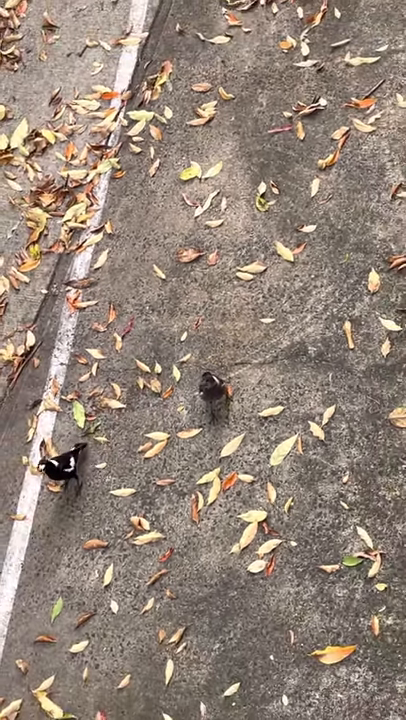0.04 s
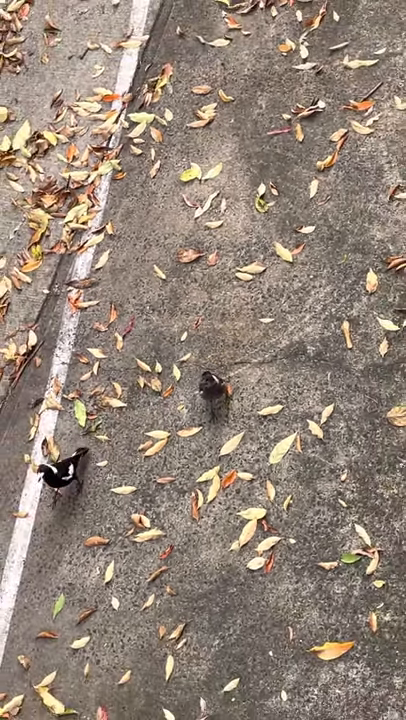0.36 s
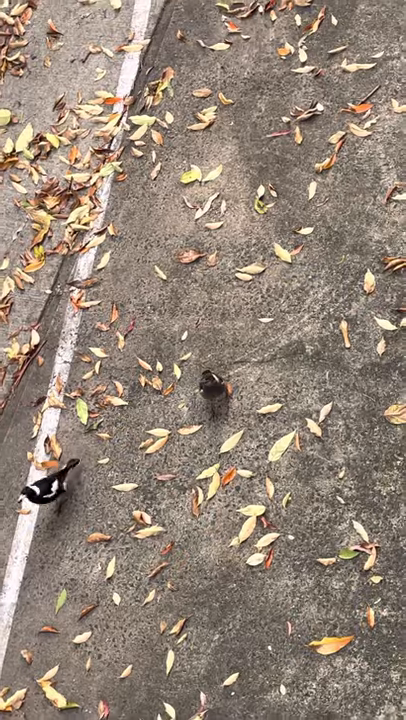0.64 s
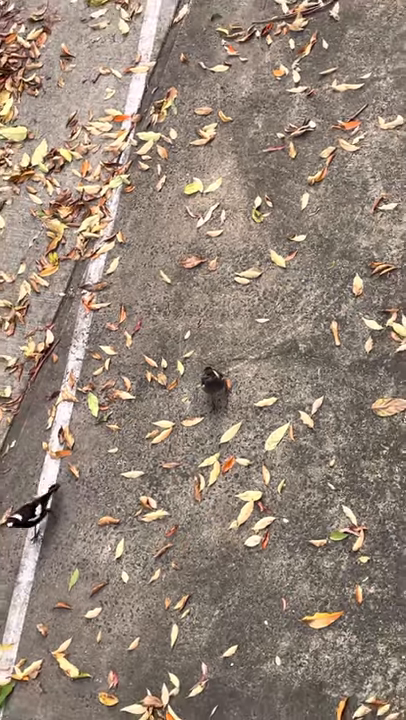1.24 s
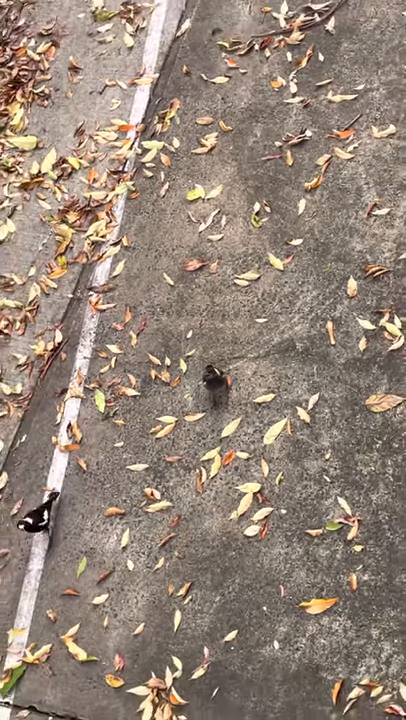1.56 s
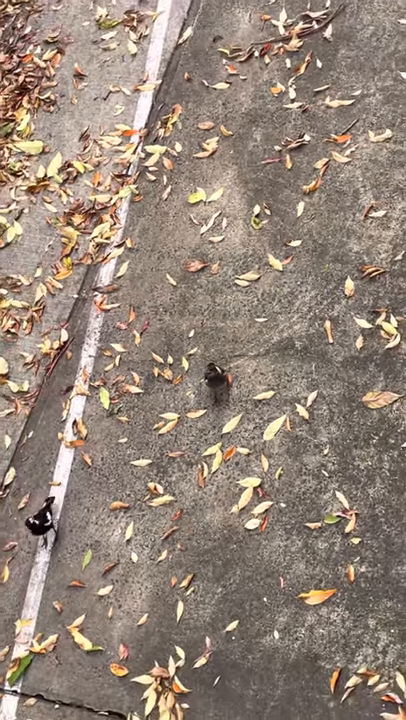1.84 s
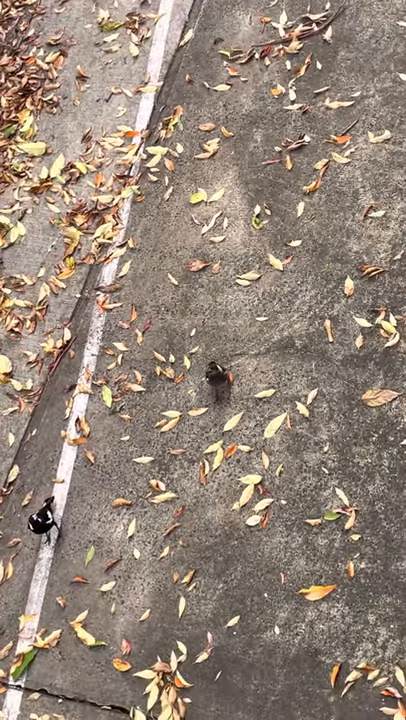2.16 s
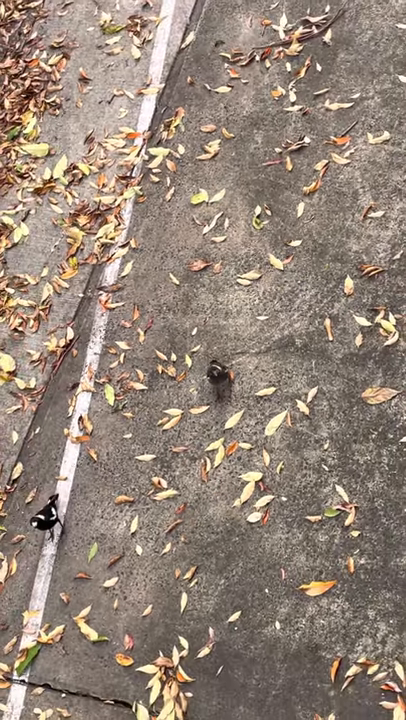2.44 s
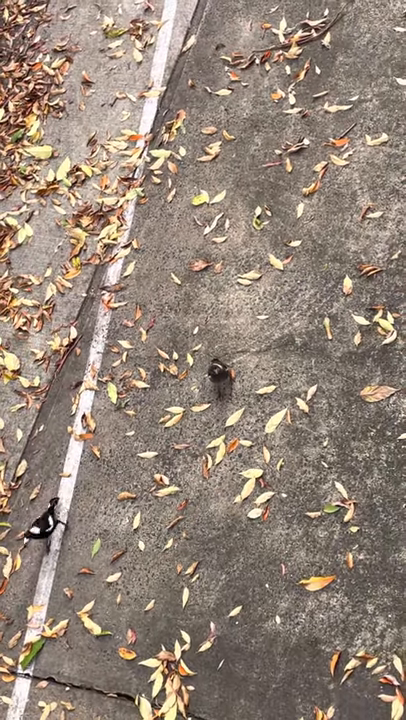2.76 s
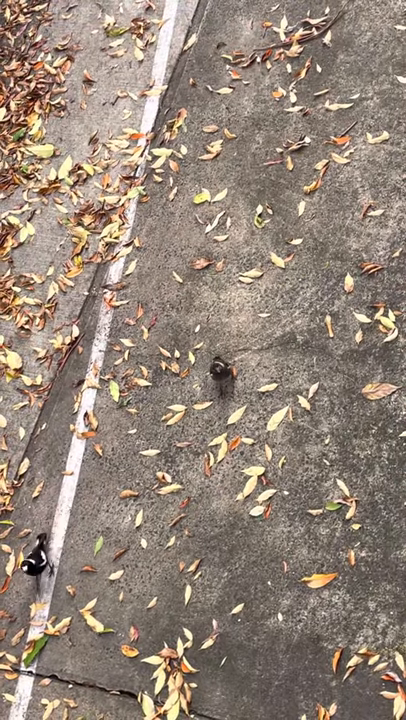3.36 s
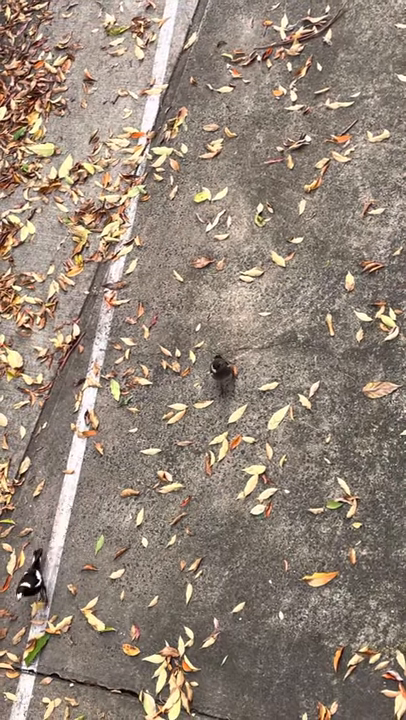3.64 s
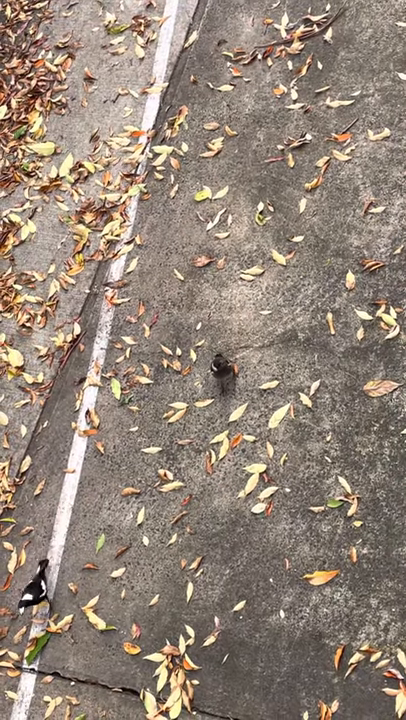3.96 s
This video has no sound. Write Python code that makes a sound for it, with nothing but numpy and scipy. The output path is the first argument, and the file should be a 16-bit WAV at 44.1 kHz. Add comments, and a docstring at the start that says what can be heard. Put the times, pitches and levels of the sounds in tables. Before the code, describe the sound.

Short, rising squawks from a begging young bird repeat seven times in a paved yard, with a shrill edge and a slight echo. Behind them runs a low rumble of far traffic and a faint wavering hum.

```python
"""A young bird begs seven times on a paved yard: nasal squawks that slide upward, turn harsh and drop off.
Its syrinx is a harmonic source that irregular modulation frays into rasp; a sharp whistling peak near
5.3 kHz varies in strength from call to call. Pavement and nearby walls return short echoes and a tail.
Distant traffic rumbles underneath as shaped noise, with the faint wavering hum of a motor."""
import sys
import numpy as np
from scipy import signal
from scipy.fft import rfft, irfft
from scipy.io import wavfile

SR = 44100
rng = np.random.default_rng(int(sys.argv[2]) if len(sys.argv) > 2 else 0)


def store_pcm(level_fs):
    """Save levels as 16-bit WAV."""
    pcm = np.round(np.clip(level_fs, -1, 1) * 32767).astype(np.int16)
    wavfile.write(sys.argv[1], SR, np.atleast_2d(pcm).T)


N = 176400

ATTACK_S, RELEASE_S, VOICING_S = 0.0062, 0.032, 0.03
DROP_HZ, FALL_FADE_DB = 110.3, 2.5   # pitch and level lost over a call's fall time
JITTER, HARSH_JITTER, JITTER_RATE_HZ = 0.0049, 0.016, 93   # depths are shares of the pitch
HARSH_FROM, RATTLE_DEPTH, RASP_HZ = 0.42, 0.3, 170   # harshness sets in at this share of the rise
RASP_CALM, RASP_HARSH = 0.1, 0.6   # rasp's share of a harmonic's power: base, added at full strain
SHIMMER_DB, BREATH_DB, RASP_HISS_DB = 1.5, -57.5, -55
NASAL_HZ, WHISTLE_HZ, EDGE_HZ, PEAK_OCTAVES = 3100, 5250, 9000, 0.065
EARLY_PITCH_HZ, LATE_PITCH_HZ = 920, 1030   # between these the whistle's gain goes from early to late


def bird():
    """Superposition: seven begging calls add up, each with its own glide and timbre."""
    # calls: (start [s], rise [s], fall [s], pitch at five even steps of the rise [Hz], gain [dB],
    # nasal peak [dB], early whistle [dB], late whistle [dB], edge [dB], harshness [0-1])
    calls = [(.010, 0.17, 0.014, (687, 790, 916, 1013, 1089), -1, 3, 1, 2.5, 2.5, 0.1),
             (.565, 0.19, 0.029, (675, 850, 987, 1068, 1104), -1, 2.5, -5, 0, 1.5, 0.71),
             (1.000, 0.16, 0.023, (682.6, 790, 924, 1033, 1088), -2, -4.5, -6, -2.5, 1, 0.37),
             (1.570, 0.21, .022, (663, 765, 893, 1009, 1101), -0.5, 3, 1, 3, 2.2, 0.2),
             (2.310, .218, .024, (650, 730, 838, 982, 1047), 0, 1, 5.5, -1.5, -0.5, 0.13),
             (3.150, 0.24, .030, (647.6, 800, 996, 1128, 1188), 0, -0.5, 3, 2.5, 1, 0.46),
             (3.730, 0.18, 0.024, (659, 745, 872.5, 1009, 1061), 0.6, -5.5, 2, 2, 1, 0.01)]
    out = np.zeros(N + SR)
    for start_s, rise_s, fall_s, climb_hz, gain_db, *timbre in calls:
        call = squawk(rise_s, fall_s, climb_hz, *timbre)
        onset = int(start_s * SR)
        out[onset:onset + len(call)] += from_db(gain_db) * call
    return out[:N]


def squawk(rise_s, fall_s, climb_hz, nasal_db, early_db, late_db, edge_db, harshness, harmonics=18):
    """Source and filter: syrinx harmonics sweep through fixed spectral peaks and fray under strain."""
    # spectrum of the call as heard, with a sharp whistling peak near 5.3 kHz:
    # (frequency [Hz], base level of a harmonic [dB])
    spectrum = [(600, -42.5), (780, -44.5), (940, -42), (1060, -49), (1170, -48), (1400, -46.5),
                (1700, -42.5), (1830, -51), (2200, -52), (2380, -49), (2520, -49), (2800, -52.5),
                (3150, -50), (3600, -55), (4200, -57.5), (4800, -55), (5050, -50.5), (5300, -43.5),
                (5600, -54), (5900, -51.5), (6200, -63), (6600, -59.5), (7500, -91), (8600, -56),
                (9500, -58.5), (10000, -63), (10500, -61), (12200, -69.5), (14500, -94)]
    # effort grows with pitch: (pitch [Hz], gain of the fundamental [dB], gain of the overtones [dB])
    effort = [(684, -7.5, -7.5), (772, -1, -6), (820, -1, -3.5), (938, 0.5, 2), (1080, 1, 2),
              (1185, 1.5, 6.5)]
    t = np.arange(int((rise_s + fall_s + RELEASE_S / 2) * SR)) / SR
    size = len(t)
    risen = np.clip(t / rise_s, 0, 1)
    fallen = np.maximum(t - rise_s, 0) / fall_s
    strain = harshness * np.clip((risen - HARSH_FROM) * 6, 0, 1)
    climb = np.polyfit(np.linspace(0, 1, len(climb_hz)), climb_hz, len(climb_hz) - 1)
    hz = np.polyval(climb, risen) - DROP_HZ * fallen ** 1.61
    jitter = JITTER * drift(JITTER_RATE_HZ, size) + HARSH_JITTER * strain * drift(2 * RASP_HZ, size)
    phase = 2 * np.pi * np.cumsum(hz * (1 + jitter)) / SR
    pitches, *gains = np.transpose(effort)
    fundamental_db, overtones_db = [np.interp(hz, pitches, gain) for gain in gains]
    whistle_db = np.interp(hz, (EARLY_PITCH_HZ, LATE_PITCH_HZ), [early_db, late_db])
    rasp = RASP_CALM + RASP_HARSH * strain
    voice = 0
    for k in range(1, harmonics + 1):
        db = at_hz(spectrum, k * hz) + (overtones_db if k > 1 else fundamental_db)
        db += timbre_db(k * hz, nasal_db, whistle_db, edge_db) + SHIMMER_DB * drift(48, size)
        tone = np.sin(k * phase)
        noise_band = drift(RASP_HZ, size) * tone + drift(RASP_HZ, size) * np.cos(k * phase)
        voice += from_db(db) * (np.sqrt(2 * (1 - rasp)) * tone + np.sqrt(rasp) * noise_band)
    puffs = rng.standard_normal(size) * (1 + np.cos(phase))   # breath pulses once a cycle
    hiss = irfft(rfft(puffs) * from_db(at_hz(spectrum, bins(size))) * np.sqrt(bins(size)), size)
    hiss *= (from_db(BREATH_DB) + strain * from_db(RASP_HISS_DB)) / hiss.std()
    # the tone grows out of the hiss and softens as it drops
    voicing = np.clip(t / VOICING_S, 0, 1) * from_db(-FALL_FADE_DB * np.minimum(fallen, 1))
    envelope = np.clip(t / ATTACK_S, 0, 1) * np.clip((t[-1] - t) / RELEASE_S, 0, 1)
    rattle = 1 + RATTLE_DEPTH * strain * drift(RASP_HZ, size)
    return envelope * (voicing * voice + hiss) * rattle


def timbre_db(hz, nasal_db, whistle_db, edge_db):
    """Spectral shaping: a nasal peak, a whistling peak and the top vary in strength from call to call."""
    nasal = np.exp(-0.5 * (np.log2(hz / NASAL_HZ) / PEAK_OCTAVES) ** 2)
    whistle = np.exp(-0.5 * (np.log2(hz / WHISTLE_HZ) / PEAK_OCTAVES) ** 2)
    edge = np.clip((hz / EDGE_HZ) ** 10, 0, 1)
    return nasal_db * nasal + whistle_db * whistle + edge_db * edge


def yard(direct, t60_s=0.5, tail_db=-11.5):
    """Reflection and reverberation: hard surfaces add echoes and an exponentially decaying tail."""
    # reflections from pavement and walls: (delay [s], gain [dB])
    reflections = [(.0075, -16.5), (.017, -14), (.036, -19.5)]
    # spectrum of the tail: (frequency [Hz], relative level [dB])
    colour = [(900, -5), (3200, 6.5), (5300, -3.5), (6500, 10), (10000, -5)]
    t = np.arange(N) / SR
    echoes = sum(from_db(db) * np.interp(t - delay, t, direct, left=0) for delay, db in reflections)
    build_up = np.clip(t[:SR] / 0.022, 0, 1)
    tail = diffuse_noise(colour, SR) * from_db(-60 * t[:SR] / t60_s) * build_up
    tail /= np.sqrt(np.sum(tail ** 2) / 2)   # unit mean energy per channel
    reverberation = signal.fftconvolve(direct[None], tail, axes=1)[:, :N]
    return direct + echoes + from_db(tail_db) * reverberation


def traffic():
    """Incoherent sources add in power: far engines rumble and swell under a wash of road noise."""
    # spectra of engine rumble, low roar and even wash: (frequency [Hz], base density [dB per Hz])
    rumble = [(20, -90), (32, -70), (46, -71.5), (64, -54.5), (82, -56), (100, -59), (120, -53.5),
              (155, -64.5), (230, -76), (400, -117), (1000, -130)]
    roar = [(150, -93), (230, -68.5), (310, -72), (450, -82), (800, -100), (2000, -130)]
    wash = [(25, -99), (100, -75.5), (200, -64), (280, -69.5), (400, -75), (600, -76.5), (950, -75.5),
            (1400, -82), (2000, -84.5), (3000, -90.5), (5200, -92), (7000, -104), (10000, -100),
            (12500, -105), (14000, -125)]
    # how each swells and ebbs: (time [s], gain [dB])
    rumble_gain = [(0, 0), (.7, -3), (1, -4), (1.35, -2.5), (1.7, -1), (1.92, 4), (2.1, 1.5), (2.25, -3.5),
                   (2.46, 2), (2.7, 0), (2.95, -2.5), (3.5, -0.5), (4, -2)]
    roar_gain = [(0, -4), (1.2, -9), (1.75, 1), (2.1, -4), (2.4, -1), (3, -2), (3.5, 2.5), (4, 2.5)]
    wash_gain = [(0, 1), (.9, 0.5), (1.7, .5), (2.2, 1), (2.8, 0.5), (3.4, 0.5), (4, 1)]
    layers = [(rumble, rumble_gain), (roar, roar_gain), (wash, wash_gain)]
    return sum(diffuse_noise(spectrum, N) * from_db(in_time(gain)) for spectrum, gain in layers)


def motor_hum(pitch_hz=187, waver_hz=1.8, flicker_db=2):
    """Frequency and amplitude modulation: a distant motor tone wavers and fades in and out."""
    # slow course of the hum, before its flicker: (time [s], level [dB])
    level = [(0, -44), (.4, -46), (1.4, -44.5), (1.7, -48.5), (2.3, -52.5), (2.9, -50.5), (3.4, -40),
             (4, -46.5)]
    phase = 2 * np.pi * np.cumsum(pitch_hz + waver_hz * drift(4.55, N)) / SR
    return np.sqrt(2) * from_db(in_time(level) + flicker_db * drift(5.5, N)) * np.sin(phase)


def diffuse_noise(spectrum, size):
    """Diffuse field: noise from all around is coherent between the channels mainly in the bass."""
    # likeness of left and right: (frequency [Hz], coherence [0-1])
    likeness = [(60, .9999), (170, .9995), (270, .985), (420, .84), (700, .56), (1200, .62), (2100, .83),
                (4000, .86), (7000, .75), (12000, .7)]
    hz = bins(size)
    coherence = at_hz(likeness, hz)
    mid, side = rfft(rng.standard_normal((2, size)))
    stereo = np.sqrt((1 + coherence) / 2) * mid + np.sqrt((1 - coherence) / 2) * side * [[1], [-1]]
    return irfft(stereo * from_db(at_hz(spectrum, hz)), size) * np.sqrt(SR / 2)


def drift(rate_hz, size):
    """Random fluctuation: low-passed noise with unit standard deviation."""
    pole = np.exp(-2 * np.pi * rate_hz / SR)
    slow = signal.lfilter([1], [1, -2 * pole, pole * pole], rng.standard_normal(size + SR))[SR:]
    return slow / slow.std()


def from_db(db):
    """Decibel law: 20 dB is a tenfold amplitude."""
    return 10 ** (np.asarray(db) / 20)


def in_time(rows):
    """Linear interpolation of a time curve at every sample."""
    return np.interp(np.arange(N) / SR, *np.transpose(rows))


def at_hz(points, hz):
    """Interpolation of a spectrum on a log-frequency axis."""
    knots_hz, values = np.transpose(points)
    return np.interp(np.log(np.maximum(hz, 1)), np.log(knots_hz), values)


def bins(size):
    """Fourier frequencies [Hz] of this many samples."""
    return np.arange(size // 2 + 1) * SR / size


def scene():
    """Superposition: the bird in its yard adds to the traffic and the hum."""
    return yard(bird()) + traffic() + motor_hum()


def record(dry, cutoff_hz=15700):
    """Phase shift: two microphone ports offset the treble against each other; a low-pass cuts the top."""
    # lead of the left port over the right: (frequency [Hz], phase [rad])
    port_phase = [(100, 0), (1600, 0), (2800, .7), (4400, .65), (5200, 0), (6030, 1.2), (7600, 3.14),
                  (9500, 5.1), (11200, 6.3), (13000, 7.6), (15000, 9.2)]
    lead = np.interp(bins(N), *np.transpose(port_phase))
    ports = irfft(rfft(dry) * np.exp(0.5j * lead * np.array([[1], [-1]])), N)
    return signal.sosfilt(signal.ellip(10, 0.2, 80, cutoff_hz, fs=SR, output="sos"), ports)


dry = scene()
out = record(dry)
store_pcm(out)
```